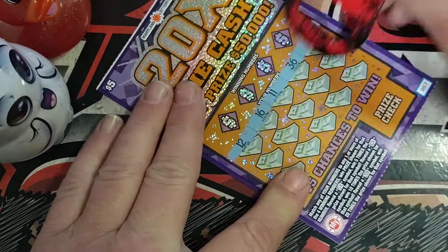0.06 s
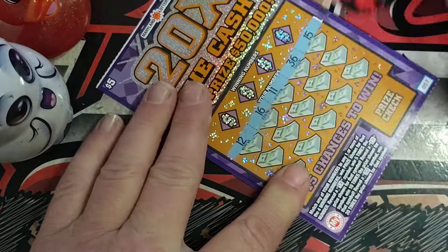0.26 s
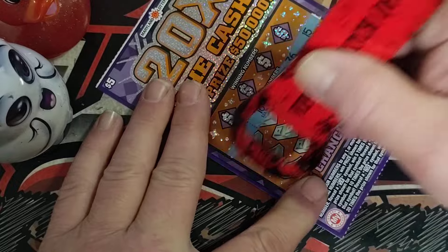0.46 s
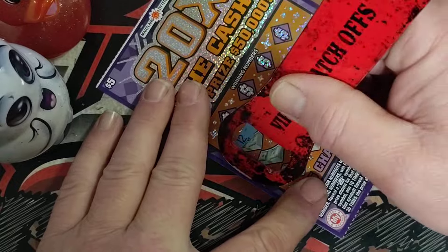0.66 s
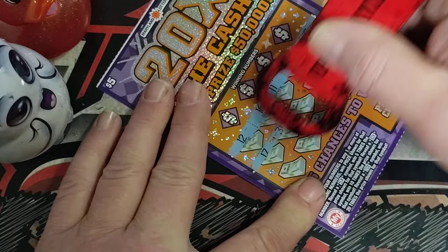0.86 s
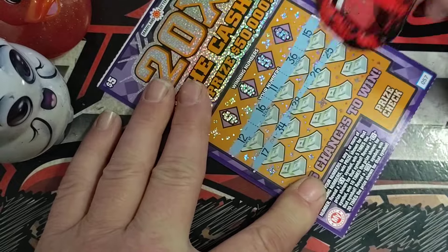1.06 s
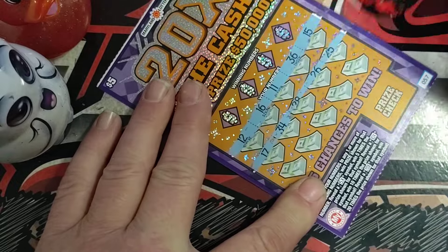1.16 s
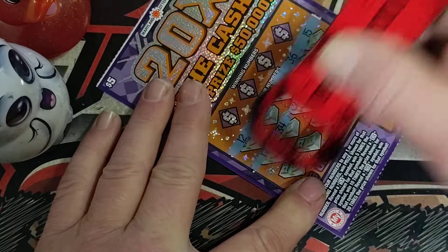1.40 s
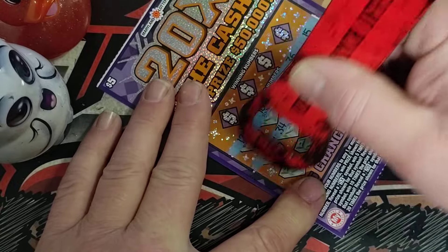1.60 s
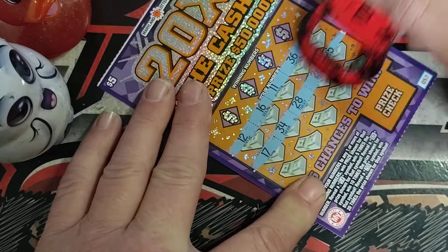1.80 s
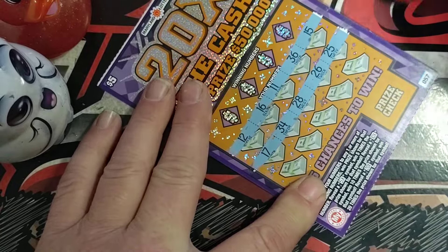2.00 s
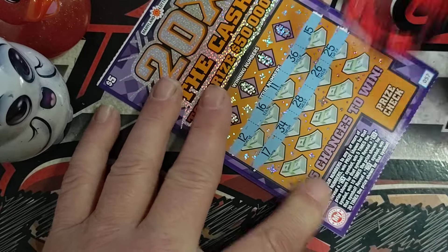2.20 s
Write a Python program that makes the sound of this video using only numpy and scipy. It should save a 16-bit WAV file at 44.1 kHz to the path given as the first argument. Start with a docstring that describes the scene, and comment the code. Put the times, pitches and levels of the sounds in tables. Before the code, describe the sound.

A plastic scraper rasps across a paper scratch ticket in three short, gritty strokes, the last one loudest. Soft table thuds, small ticks and faint swishes fall between them, close to the microphone in a quiet room.

```python
"""At a table in a quiet room, close to a stereo microphone, a plastic scraper is drawn three times
across the coating of a paper ticket. Dense grit rings the scraper's resonances over a broad rasp.
The table thuds as the tool lands and as a stroke ends.
Small ticks and soft swishes fall between the strokes, over a short room tail and quiet air."""
import sys
import numpy as np
from scipy import signal
from scipy.fft import rfft, irfft, next_fast_len
from scipy.io import wavfile
from scipy.ndimage import map_coordinates

SR = 44100
rng = np.random.default_rng(int(sys.argv[2]) if len(sys.argv) > 2 else 0)


def generate_wav(signal):
    """Clip the signal to [-1, 1] and save it as 16-bit WAV at the path in sys.argv[1]."""
    frames = np.transpose(np.atleast_2d(signal))
    scaled = np.clip(frames, -1, 1) * 32767
    pcm = np.round(scaled).astype(np.int16)
    wavfile.write(sys.argv[1], SR, pcm)


N = 99225

# One list per stroke. Each row: time in seconds, treble ring level in dB, then in dB re that level
# the lowest, low, middle and high rings and the rasp.
STROKE_POINTS = [
    [(0.0, -49.5, -14.5, -24, -1.5, -17, -10.5), (0.028, -68, 0, -7, -13, -3, -2),
     (0.04, -56.5, -3, -24, -7, -10, -13), (0.05, -61, -3, -16, 0, -13, -4),
     (0.058, -56, -6.5, -29, -2, -10, -13), (0.084, -55, -7, -8, -4.5, -19, -6.5),
     (0.102, -54.5, -2, -16, 0, -20, -7), (0.118, -60, 4, -18, -8, -6, -6),
     (0.134, -66, 6, -1, -5, -6, 0.5), (0.146, -62.5, 4, -8, -3, -3, -2),
     (0.184, -61, 0.5, -0.5, 0, -14, -14.5), (0.194, -61, -47, -29, -31, -16, -15),
     (0.21, -60.5, -24, -1, -25, -7, -5)],
    [(0.765, -74.5, -1, -12, -2, -1, -9), (0.802, -72.5, -4, -6, 2, -6, -12),
     (0.81, -57, 3, -8, 2.5, 3, -17), (0.86, -66.5, 9.5, -9, 2, 4.5, -2),
     (0.916, -54.5, -2, -8, 1, -4, -11.5), (1.022, -47, -12, -17.5, -6, -4, -6),
     (1.054, -46, -8.5, -5.5, -4.5, -21, -8), (1.07, -53.5, 1, 1.5, -5, -11, 0),
     (1.082, -50, -2.5, -8.5, -17, -12, -4.5), (1.104, -61.5, 6, 2, 7, -2, -2),
     (1.12, -53, 3.5, -3.5, -3, -9, -9.5), (1.15, -68.5, 11.5, 16.5, 3, -3, -2),
     (1.164, -61, -15, -35, -8, -12, -11), (1.21, -65.5, -6, -22, -1.5, -5, -7.5)],
    [(1.62, -76.5, -7, -24, -6, -0.5, -12), (1.676, -60.5, 4.5, -8, -1, 2, -10.5),
     (1.748, -46.5, -12.5, -22, -5, -14, -14), (1.76, -51, -7.5, -13, -8, -3, -10),
     (1.776, -43, -7.5, -25, -15, -15, -15.5), (1.794, -45.5, -9, -22, -6, -4.5, -8),
     (1.826, -40.5, -15, -13.5, -13, -9, -12), (1.856, -42, -7.5, -12.5, -9.5, -13, -13.5),
     (1.894, -42.5, -13, -24, -14, -16, -7.5), (1.936, -39, -8.5, -8, -13, -11, -17.5),
     (1.946, -51, -7, 0.5, -1, -17, -1), (1.98, -52.5, -8.5, -13, -16, -6.5, -16),
     (2.02, -65.5, -4, -12, -10, -11, -6)],
]


def stroke_levels_db():
    """Levels of five ring groups, low to treble, and the rasp; each stroke dies after its last point."""
    release_db_per_s = 433
    t, levels_db = np.arange(N) / SR, np.full((6, N), -200.)
    for points in STROKE_POINTS:
        times_s, treble_db, *rings_db, rasp_db = np.transpose(points)
        begun = t >= times_s[0]
        fall_db = release_db_per_s * np.maximum(t[begun] - times_s[-1], 0)
        for row, offset_db in enumerate(rings_db + [0, rasp_db]):
            levels_db[row, begun] = np.interp(t[begun], times_s, treble_db + offset_db) - fall_db
    return levels_db


# Scraper resonances. Each row: frequency in Hz, width in Hz, left gain in dB, right gain in dB.
SCRAPER_MODES = [(1025.7, 70, -5, -0.5), (1102, 90, -2.5, -3), (1265, 170, -7.5, -4.5),
                 (1521, 91, -2.5, -7), (1973, 99, 5.5, 5.5), (2877, 200, -9.5, -15.5),
                 (2980, 125, -3.5, -7.5), (4457, 140, -11.5, -8.5), (5881, 174, 5.5, -7),
                 (6440, 250, -24, -18), (7127, 55, -18.5, -8), (9330, 140, -14, -5), (9760, 91, -17, -7.5),
                 (10665, 50, -18.5, -9), (10885, 430, -12, 2), (11570, 250, -42, 1), (12000, 57, -27, -5),
                 (12930, 340, -18, -8.5), (13700, 750, -31, -7.5), (15000, 450, -25, -16),
                 (16000, 340, -55, -16.5)]
# Each entry: lead of one resonance at the left port in ms.
MODE_LEADS_MS = [.25, .33, 0, .24, .09, .23, .23, .2, .16] + [.1] * 12
# Each entry: upper edge in Hz of the lowest, low, middle or high ring group.
GROUP_EDGES_HZ = [1400, 2400, 5000, 7500]


def scraper_rings(grit_drive, tick_drive, levels_db, flicker_db):
    """Grit of flickering strength rings every resonance; ticks ring the upper ones."""
    tick_gain_db, waver_s = -17, .0001
    out = 0
    for (hz, width_hz, left_db, right_db), lead_ms in zip(SCRAPER_MODES, MODE_LEADS_MS):
        group = np.searchsorted(GROUP_EDGES_HZ, hz)
        level_db = levels_db[group] + flicker_db + 1.6 * drift(rate_hz=20)
        drive = grit_drive * from_db(level_db)
        if hz > GROUP_EDGES_HZ[1]:
            drive = drive + from_db(tick_gain_db) * tick_drive
        left, right = resonance(drive, hz, width_hz, passes=2)
        if hz < GROUP_EDGES_HZ[-1]:  # pitch wavers as the grip shifts
            read_at = np.arange(N) + waver_s * SR * drift(rate_hz=7)
            left, right = (map_coordinates(v, [read_at], order=3, mode="nearest") for v in (left, right))
        left = np.roll(left, -round(lead_ms * SR / 1000))
        out = out + np.array([from_db(left_db) * left, from_db(right_db) * right])
    return out


# Rasp of the coating. Each row: frequency in Hz, left and right relative density in dB.
RASP_SPECTRUM = [(294, -14, -13.5), (810, -19, -7), (2380, 3.5, 3), (3330, -9, -4.5), (4470, 4, 2.5),
                 (4540, -28, -18), (6120, 4, 7.5), (7790, 2.5, 0), (9600, -15, 5.5), (11670, -16, 3.5),
                 (11650, 4.5, -5.5), (14300, -35, -36), (15700, -38, -6)]


def scrape(tick_drive):
    """Grit rings the scraper and rumbles in the table; the coating adds a broad rasp."""
    levels_db = stroke_levels_db()
    flicker_db = drift(rate_hz=20)
    grit_drive = stereo(grit())
    rings = scraper_rings(grit_drive, tick_drive, levels_db, flicker_db)
    rasp = from_db(levels_db[-1] + 6.5 + flicker_db) * unit_rms(stereo(grit(), RASP_SPECTRUM))
    return rings + table_rumble(grit_drive, levels_db[0]) + rasp


def grit():
    """Dense uneven clicks of the coating, two draws."""
    clicks_per_s, spread_db = 9000, 2.5
    sizes = from_db(spread_db * np.minimum(rng.exponential(1, (2, N)), 5))
    signs = rng.choice([-1, 1], (2, N))
    return unit_rms(sizes * signs * (rng.random((2, N)) < clicks_per_s / SR))


# Tabletop modes. Each row: frequency in Hz, gain in dB, t60 in seconds.
TABLE_MODES = [(129, -3, 0.039), (228.4, -4.5, 0.11), (253.5, -3, 0.047), (435, -15.5, 0.047),
               (522, -11.5, 0.048), (627, -7, 0.025), (799, -11.5, 0.025), (1089, -4.5, 0.024),
               (1270, -12.5, 0.024)]


def table_rumble(grit_drive, lowest_ring_db):
    """Grit drives the table modes, damped under the tool."""
    offset_db, t60_share = -12.5, 0.3
    out = 0
    for hz, db, t60_s in TABLE_MODES:
        width_hz = np.log(1000) / np.pi / (t60_s * t60_share)
        out = out + resonance(grit_drive * from_db(lowest_ring_db + offset_db + db), hz, width_hz, passes=1)
    return out


# Knocks on the table. Each row: start in seconds, gain in dB, extra gain of the deepest mode in dB,
# contact cut-off in Hz, crack gain in dB, factor on t60 under the hand.
THUD_EVENTS = [(0.212, -23.5, -18, 1610, -26.5, 1.11), (0.687, -36, 13, 446, -54, 0.95),
               (1.1874, -36.5, -9, 550, -54, 1.13), (1.557, -34.5, 12.5, 850, -52, 1.04),
               (1.984, -32.5, 1.5, 1270, -44, 1)]


def thuds():
    """A soft push rings the table modes; a short crack rides on it."""
    left_lag_s, crack_top_hz = 0.00012, 7000
    body, cracks, t = np.zeros(N + SR), 0, np.arange(SR // 4) / SR
    for start_s, db, deep_db, contact_hz, crack_db, t60_factor in THUD_EVENTS:
        modes = [from_db(mode_db - 60 * t / (t60_s * t60_factor)) * np.sin(2 * np.pi * hz * t)
                 for hz, mode_db, t60_s in TABLE_MODES]
        ring = from_db(deep_db) * modes[0] + sum(modes[1:])
        i = int(start_s * SR)
        body[i:i + len(t)] -= from_db(db) * signal.lfilter(*signal.butter(2, contact_hz, fs=SR), ring)
        cracks = cracks + puff(start_s + 0.00097, crack_db, t60_s=0.011, low_hz=1800)
    cracks = signal.lfilter(*signal.butter(4, crack_top_hz, fs=SR), cracks)
    left = np.roll(body, round(left_lag_s * SR))
    return stereo(cracks) + np.array([left[:N], body[:N]])


# Small ticks. Each row: start in seconds, gain in dB, t60 in seconds, low cut in Hz.
TICK_EVENTS = [(0.221, -48, 0.021, 3000), (0.538, -58, 0.026, 8000), (0.62, -58, 0.01, 5500),
               (0.752, -72, 0.011, 5540), (.780, -52, 0.0073, 500), (1.554, -46.5, 0.012, 4500),
               (1.579, -32.5, 0.0043, 3500), (1.618, -55.5, 0.022, 4000), (2.1927, -56.5, 0.012, 2500),
               (2.2115, -38, 0.0072, 7160)]


def ticks():
    """Sharp ticks that each bounce once, two draws."""
    bounce_s, bounce_db = .002, -7
    hits = sum(puff(*row) for row in TICK_EVENTS)
    return hits + from_db(bounce_db) * np.roll(hits, round(bounce_s * SR), axis=1)


# Swishes. Each row: start in seconds, length in seconds, gain in dB, share of the length spent rising.
SWISH_EVENTS = [(0.423, 0.15, -69, 0.23), (1.267, 0.07, -68.5, .3), (1.41, 0.12, -58.5, 0.29),
                (2.103, 0.04, -57.5, 0.82)]


def swishes():
    """Soft swells of bright noise, two draws."""
    t, swell = np.arange(N) / SR, 0
    for start_s, length_s, db, rise in SWISH_EVENTS:
        corners_s = [start_s, start_s + rise * length_s, start_s + length_s]
        swell = swell + from_db(db) * np.interp(t, corners_s, [0, 1, 0])
    return high_pass(swell * rng.standard_normal((2, N)), hz=4000, order=2)


def room_tail(near):
    """A dying diffuse tail, alike at both ports in the bass."""
    t60_s, gap_s, band_hz = .24, .004, [400, 8000]
    t = np.arange(N) / SR
    decay = from_db(-60 * t / t60_s) * (t > gap_s)
    tail = stereo(rng.standard_normal((2, N)) * decay)[:, :SR // 2]
    tail = signal.lfilter(*signal.butter(1, band_hz, "band", fs=SR), tail)
    return signal.fftconvolve(near, tail / np.sqrt(np.sum(tail ** 2) / 2), axes=1)[:, :N]


# Room air. Each row: frequency in Hz, left and right relative density in dB.
AIR_SPECTRUM = [(25.7, -30, -34), (59.3, -8.5, -0.5), (85, -7, -7.5), (138.4, 7, 8), (259, 0.5, -1),
                (384, -16.5, -6.5), (430, -2.5, -2), (860, -9, -8), (1410, -10, -6), (2620, -13, -10),
                (4100, -17, -22), (6340, -16, -22.5), (7850, -29, -25), (10900, -22.5, -20),
                (12500, -29.5, -27), (17600, -23, -24)]


def room_air():
    """A low hush whose level wanders slightly."""
    level_db = -61.5 + 2 * drift(rate_hz=8.1)
    return from_db(level_db) * unit_rms(stereo(rng.standard_normal((2, N)), AIR_SPECTRUM))


# Likeness of the microphone ports. Each row: frequency in Hz, share common to both.
PORT_COHERENCE = [(100, 0.97), (500, 0.86), (2000, 0.57), (3000, 0.23), (4500, 0.41), (8000, 0.44),
                  (15000, 0.2)]


def stereo(draws, colour=None):
    """Two unrelated draws become the two ports: partly alike, left a little late, optionally coloured."""
    left_lag_s = 0.000245
    size = next_fast_len(N + 4096)
    hz = np.arange(size // 2 + 1) * SR / size
    right, other = rfft(draws, size)
    common = at_hz(PORT_COHERENCE, hz)[0]
    left = common * right + np.sqrt(1 - common ** 2) * other
    left = left * np.exp(-2j * np.pi * hz * left_lag_s)
    gain = 1 if colour is None else from_db(at_hz(colour, hz))
    return irfft(gain * np.array([left, right]), size)[:, :N]


def puff(start_s, db, t60_s, low_hz):
    """A dying puff of high-passed noise, two draws."""
    out, i, t = np.zeros((2, N)), int(start_s * SR), np.arange(2000) / SR
    noise = from_db(db - 60 * t / t60_s) * rng.standard_normal((2, len(t)))
    out[:, i:i + len(t)] = high_pass(noise, low_hz, order=2)[:, :N - i]
    return out


def resonance(x, hz, width_hz, passes):
    """A repeated band-pass peak; white noise keeps about its level."""
    r, w = np.exp(-np.pi * width_hz / SR), 2 * np.pi * hz / SR
    for _ in range(passes):
        x = signal.lfilter([1, 0, -1], [1, -2 * r * np.cos(w), r * r], x + 1e-18) * (1 - r * r) / 2
    return x * np.sqrt(2 * passes / (1 - r * r))


def drift(rate_hz):
    """Slow random wander, spread 1."""
    hop, settle = 40, 2000
    r = np.exp(-2 * np.pi * rate_hz * hop / SR)
    slow = signal.lfilter([1], [1, -2 * r, r * r], rng.standard_normal(N // hop + settle + 2))[settle:]
    return np.interp(np.arange(N) / hop, np.arange(len(slow)), unit_rms(slow))


def at_hz(points, hz):
    """Table columns read on a log frequency axis."""
    points_hz, *columns = np.transpose(points)
    return np.array([np.interp(np.log(hz + 1), np.log(points_hz), c) for c in columns])


def high_pass(x, hz, order):
    return signal.sosfilt(signal.butter(order, hz, "high", fs=SR, output="sos"), x)


def from_db(db):
    return 10 ** (np.asarray(db) / 20)


def unit_rms(x):
    return x / np.sqrt(np.mean(x ** 2) + 1e-20)


# Colour of ticks and swishes at the ports. Each row: frequency in Hz, left and right gain in dB.
PORT_COLOUR = [(1950, 13.5, 11.5), (4600, -14, -10.5), (5600, 2, -1.5), (8200, -7, -2), (11200, -9, 6.5),
               (13600, -13, -6.5), (16100, -17, -6)]


def scene():
    """Near sounds lose their deepest bass; the room and its air are added."""
    tick_drive = ticks()
    near = scrape(tick_drive) + thuds() + stereo(tick_drive + swishes(), PORT_COLOUR)
    near = high_pass(near, hz=176, order=3)
    return near + room_air() + from_db(-15) * room_tail(near)


def record(dry):
    """A steep low-pass cuts the top."""
    cutoff_hz = 15950
    return signal.sosfilt(signal.ellip(12, .5, 70, cutoff_hz, fs=SR, output="sos"), dry)


dry = scene()
out = record(dry)
generate_wav(out)
```